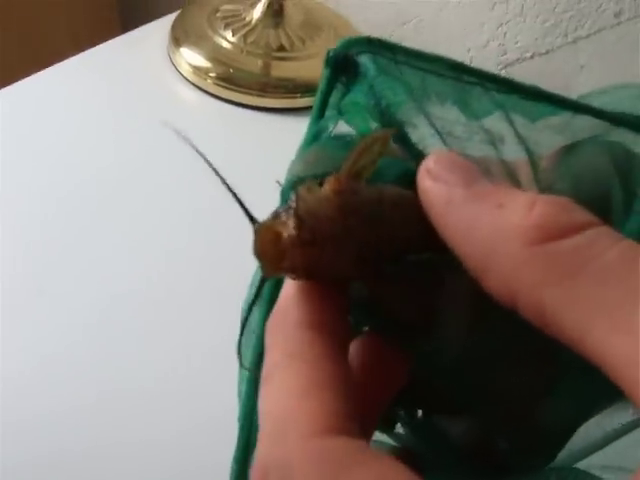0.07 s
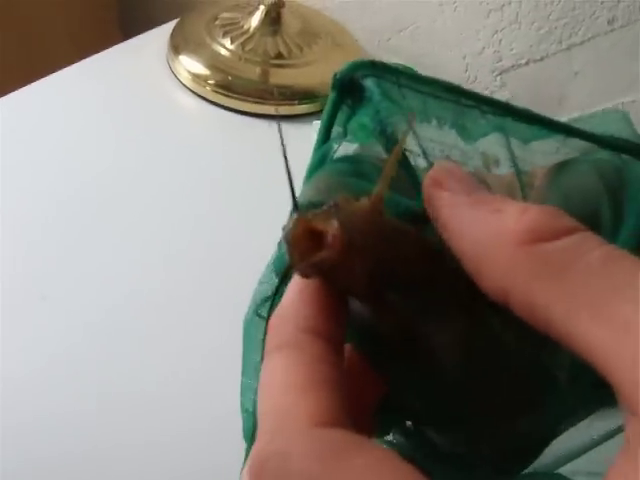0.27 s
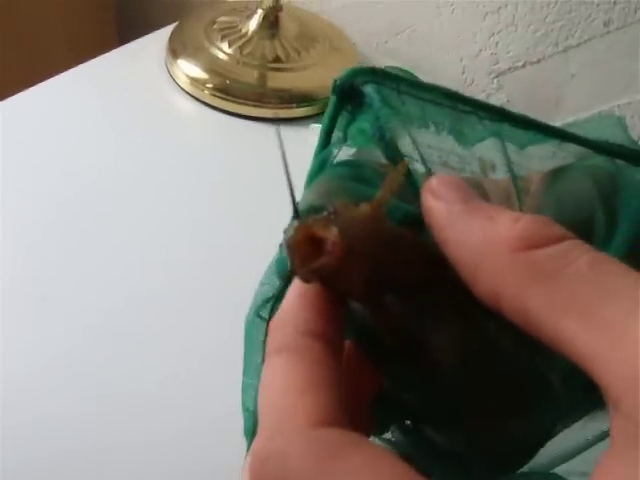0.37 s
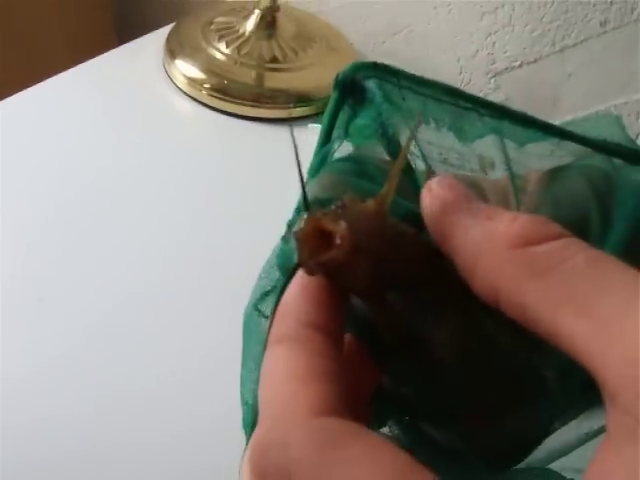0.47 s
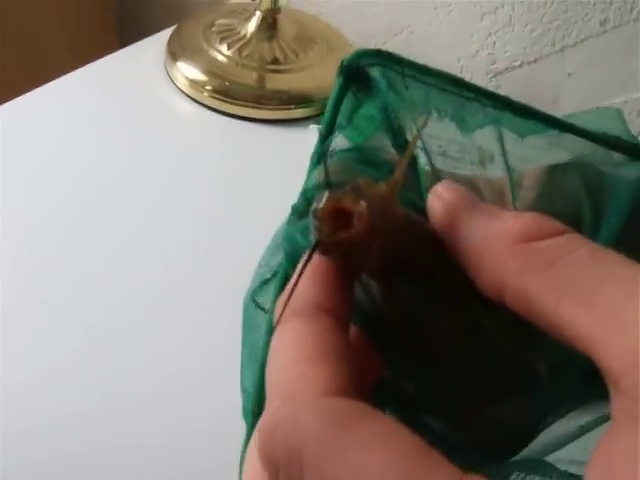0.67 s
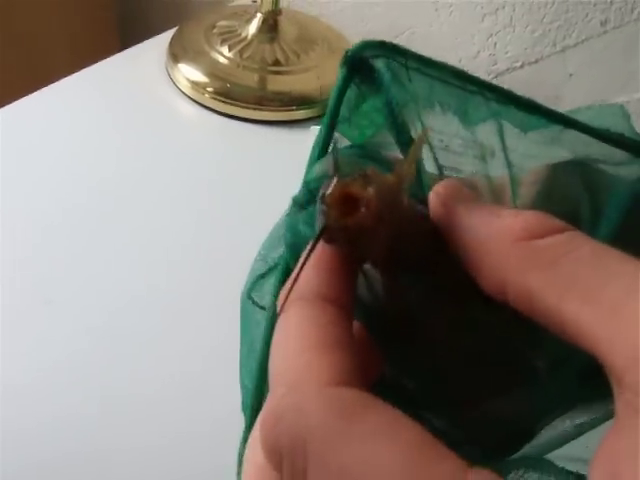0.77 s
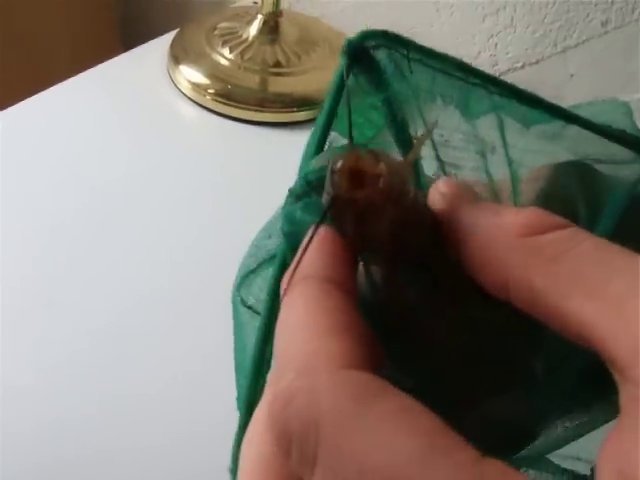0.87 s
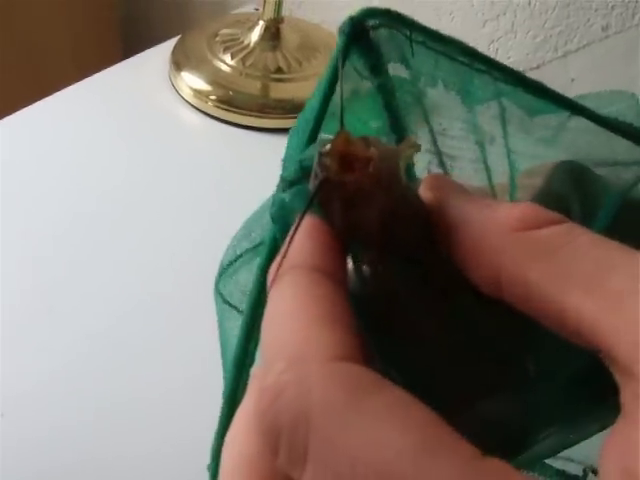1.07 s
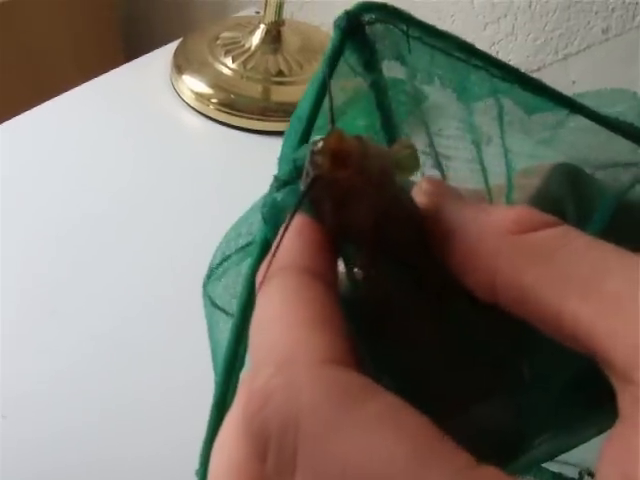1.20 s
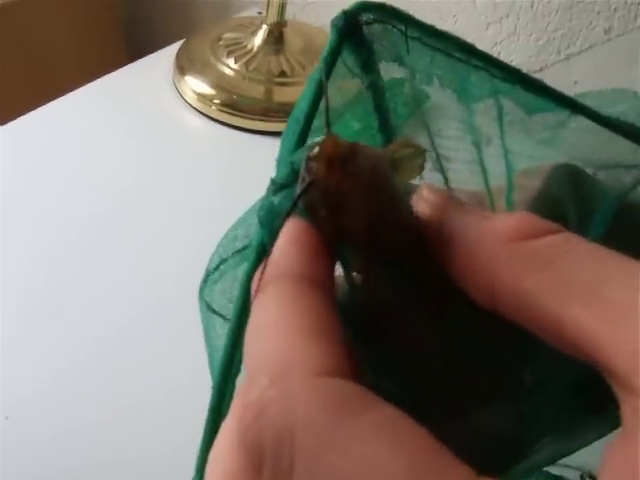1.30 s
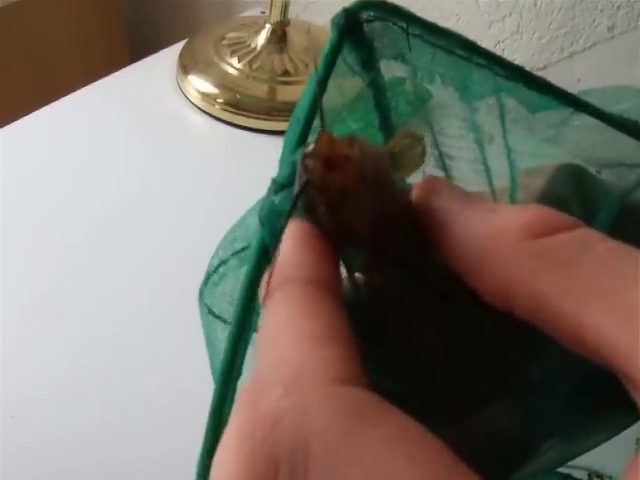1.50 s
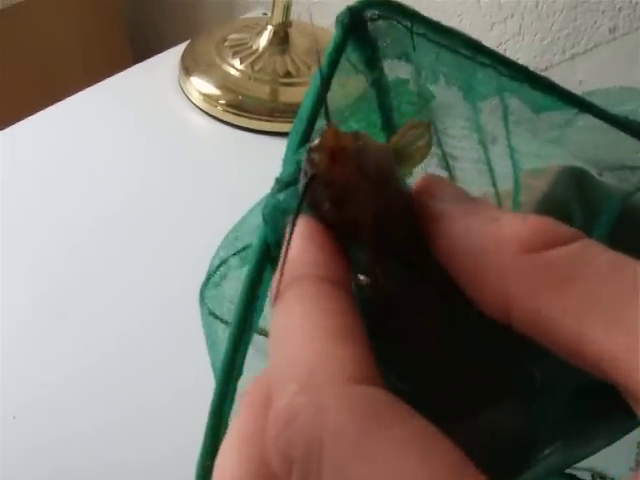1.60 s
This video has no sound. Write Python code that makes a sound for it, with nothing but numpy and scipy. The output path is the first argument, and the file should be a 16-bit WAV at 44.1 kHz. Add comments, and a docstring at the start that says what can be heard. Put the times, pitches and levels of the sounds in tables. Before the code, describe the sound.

A catfish held in a net croaks close to the microphone: eight short, raspy bursts of clicks in four quick pairs. It then stops, leaving faint hiss and a low hum in a small room.

```python
"""A small room, the microphone close to a catfish held in a net. The fish stridulates: four
out-and-back strokes of a fin spine. The spine's ridged base catches in its socket and slips, so each
stroke is a rasp of clicks that slow, swell and hurry off. Every click rings the bony girdle, then the
body and the spine's shaft. Table and walls echo it, over a few wet ticks, a low hum and hiss."""
import sys
import numpy as np
from scipy import signal
from scipy.fft import rfft, irfft
from scipy.io import wavfile
from scipy.ndimage import uniform_filter1d

SR = 44100
rng = np.random.default_rng(int(sys.argv[2]) if len(sys.argv) > 2 else 0)


def file_out(sig):
    """Save sig as 16-bit WAV at sys.argv[1]."""
    # one column per channel
    cols = np.atleast_2d(sig).T
    # limit, then scale
    lim = np.clip(cols, -1, 1)
    pcm = np.round(lim * 32767).astype(np.int16)
    wavfile.write(sys.argv[1], SR, pcm)


N = 72765

# Strokes close to the microphone, out and back in turn: (start [s], length [s], ridges [count],
# longest / shortest gap [ratio], slowest place [0-1], loudest place [0-1], rise to it [dB],
# girdle trim [dB], body trim [dB], shaft trim [dB], girdle pitch [ratio])
SPINE_STROKES = [ (.2229, .0939, 24, 2.78, .82, 0.86, 13, 0, 1.5, 5.5, 1.014),
                 (.3351, 0.06, 11, 3.3, 0.58, 0.83, 8.5, 0, -5, -16, 0.99),
                 (.4268, .0905, 19, 2.9, .74, 0.75, 6, -2.5, 1, -3.5, 1.032),
                 (.5405, .0690, 12, 2.8, 0.55, 0.68, 5, -1.5, -7, -9, 1.0),
                 (.6422, 0.091, 19, 3.18, 0.74, 0.71, 8, -3.5, 1, 0.5, 1.02),
                 (.7605, .0730, 14, 2.2, .64, 0.7, 8.5, -3.5, -8.5, -10.5, 1.007),
                 (.8705, 0.091, 20, 2.2, 0.65, 0.65, 7.5, -5, -1.5, 0.5, 1.064),
                 (.9886, 0.077, 13, 2.38, .62, 0.48, 11, -3.5, -7.5, -13, 1.017)]
def spine(click_samples=600):
    """Ridge after ridge slips: the harder the spine presses, the longer the gap and louder the click."""
    grip_db, grip_s = -5.5, 0.0036  # the ridges take a moment to bite
    body_lead = 0.14  # the body peaks this share of a stroke sooner
    rasp = np.zeros(N)
    for k, stroke in enumerate(SPINE_STROKES):
        start, length, ridges, slowing, slowest, peak, rise_db, *trims_db, pitch = stroke
        girdle_db, body_db, shaft_db = trims_db
        back = k % 2
        fall_db = 10 if back else 9
        chance = rng.standard_normal((ridges, 3))
        midpoints = (np.arange(ridges - 1) + .5) / (ridges - 1)
        gaps = slowing ** np.interp(midpoints, [0, slowest, 1], [0, 1, 0])
        gaps *= 1 + .015 * chance[1:, 0]
        places = np.r_[0, np.cumsum(gaps)] / gaps.sum()
        for place, (_, level_chance, rebound_chance) in zip(places, chance):
            at = start + length * place
            i = int(at * SR) - click_samples // 10
            t = (i + np.arange(click_samples)) / SR - at
            girdle_gain = undb(girdle_db - 18 + swell(place, peak, rise_db, fall_db))
            body_gain = undb(body_db - 28 + swell(place, peak - body_lead, rise_db, fall_db))
            click = girdle_gain * girdle(t, back, pitch, rebound_chance)
            click += body_gain * body(t, back)
            click += undb(shaft_db - 33) * shaft(t, back, place)
            bite_db = grip_db * np.exp(-length * place / grip_s)
            rasp[i:i + click_samples] += click * undb(bite_db + .7 * level_chance)
    # so small a body gives off no bass
    return signal.sosfilt(signal.butter(2, 650, "high", fs=SR, output="sos"), rasp)


# Modes of the bony girdle: (base pitch [Hz], t60 [s], out level [dB], back level [dB])
GIRDLE_MODES = [(4670, 0.0037, -13.5, -29), (5690, 0.0061, -14, -13), (6920, 0.0035, -1.5, -5),
                (7610, 0.0042, -8.5, -5)]
def girdle(t, back, pitch, rebound_chance):
    """The bone rings first and brightest; the spine knocks once more after each slip."""
    lead_s, attack_s = 0.000295, 0.00027
    rebound_s = 0.000536 * (1 + 0.16 * rebound_chance)
    slip = strike(t + lead_s, GIRDLE_MODES, back, pitch, attack_s)
    rebound = strike(t + lead_s - rebound_s, GIRDLE_MODES, back, pitch, attack_s)
    return slip + undb(-4) * rebound


# Modes of the body: (base pitch [Hz], t60 [s], out level [dB], back level [dB])
BODY_MODES = [(1270, 0.0037, -11, -7.5), (1654, 0.0099, -3, -4.5), (2160, 0.0059, -5, 1.5),
              (2626, 0.0048, -4.5, 3), (3610, 0.006, -2.5, -8)]
def body(t, back):
    """The body answers each slip with a lower, softer knock."""
    return strike(t, BODY_MODES, back, pitch=0.97)


# Modes of the spine's shaft: (base pitch [Hz], t60 [s], out level [dB], back level [dB])
SHAFT_MODES = [(978, 0.0077, -8, 5.5), (4800, .013, -4, -12)]
def shaft(t, back, place, peak=0.17):
    """The shaft rings loudest early in a stroke, and its modes climb from click to click."""
    modes = sum(strike(t, [mode], back, pitch=1 + climb * (place - peak))
                for mode, climb in zip(SHAFT_MODES, (.9, 0.15)))
    return modes * undb(swell(place, peak, rise_db=4, fall_db=21))


def strike(t, modes, back, pitch, attack_s=0.000715):
    """One click rings a part of the fish, a little differently each time."""
    sound = np.zeros(len(t))
    for hz, t60, out_db, back_db in modes:
        db = (back_db if back else out_db) + rng.normal(0, 1.2)
        sound += undb(db) * ring(t, hz * pitch * rng.normal(1, .025), t60, attack_s)
    return sound


def swell(place, peak, rise_db, fall_db):
    """Arch of loudness along a stroke, in dB."""
    before = rise_db * (1 - place / peak) ** 2
    after = fall_db * ((place - peak) / (1 - peak)) ** 2
    return -np.where(place < peak, before, after)


def ring(t, hz, t60, attack_s):
    """A damped mode that starts at t = 0 and builds up over the attack."""
    t = np.maximum(t, 0)
    rise = np.sin(np.pi / 2 * np.minimum(t / attack_s, 1)) ** 2
    return rise * undb(-60 * t / t60) * np.sin(2 * np.pi * hz * (t - attack_s))


# Wet ticks at the net: (time [s], pitch [Hz], t60 [s], level [dB])
WET_TICKS = [(.0620, 7820, 0.0055, -30), (1.3910, 3130, 0.0078, -32.5), (1.4324, 7700, .008, -38.5)]
def wet_ticks():
    """Tiny bubbles burst on the wet fish and net."""
    t = np.arange(N) / SR
    return sum(undb(db) * ring(t - at, hz, t60, attack_s=0.000718) for at, hz, t60, db in WET_TICKS)


# Echoes off the table and things on it: (delay [s], level [dB])
TABLE_ECHOES = [(.0017, -16), (.0029, -15)]
# Long, faint rings under the clicks: (pitch [Hz], relative level [dB])
FAINT_RINGS = [(1595, -2), (1678, -1), (2014, -2), (2430, -5), (2780, -3), (3535, -5), (5297, 4),
               (5690, -1), (6040, -5), (6770, 0), (7030, -3), (7610, -3)]
def room(sound, ring_t60=.065):
    """The direct sound reaches the microphone with close echoes, faint rings and a tail off the walls."""
    t = np.arange(SR // 2) / SR
    response = np.zeros(len(t))
    response[0] = 1
    for delay, db in TABLE_ECHOES:
        response += undb(db) * np.sinc((t - delay) * SR)
    for hz, db in FAINT_RINGS:
        response += undb(db - 50 - 60 * t / ring_t60) * np.cos(2 * np.pi * hz * t)
    onset = np.minimum(t / .001, 1) ** 2
    for db, t60 in ((-10, .045), (-12, 0.39)):  # quick scatter, then the walls
        tail = rng.standard_normal(len(t)) * undb(-60 * t / t60) * onset
        response += undb(db) * tail / np.linalg.norm(tail)
    return signal.fftconvolve(sound, response)[:N]


# Hum and thin whine behind the fish: (pitch [Hz], rms level [dB], flutter [dB])
HUM_TONES = [(160.9, -55.5, 1), (138.1, -64.5, 1.5), (209.3, -68, -1.5), (579.7, -69.5, 8.5),
             (8300, -70, 4.5), (7140, -76, -3)]
def hum():
    """Tones waver in phase and level, as of a small motor."""
    t = np.arange(N) / SR
    tones = np.zeros(N)
    for hz, db, flutter_db in HUM_TONES:
        tone = np.sin(2 * np.pi * hz * t + 1.2 * drift(5))
        tones += level(tone * undb(flutter_db * drift(11.38)), db)
    return tones


# Spectra of the room tone: (frequency [Hz], relative density [dB])
RUMBLE_SPECTRUM = [(20, 2.5), (65, 1.5), (100, -0.5), (170, 6), (240, 7), (330, -17), (600, -34)]
HISS_SPECTRUM = [(150, -42), (250, -9), (373, -5.5), (432, -7.5), (564, -4), (684, -6.5), (782, -7),
                 (1960, -13.5), (7530, -14), (8600, -21), (11200, -65), (18900, -120)]
def room_tone():
    """Low rumble and even hiss fill the room."""
    return level(noise(RUMBLE_SPECTRUM), -59.5) + level(top_cut(noise(HISS_SPECTRUM)), -53.5)


def noise(spectrum):
    """Noise shaped by (Hz, dB) points."""
    hz, db = np.array(spectrum).T
    f = np.maximum(np.fft.rfftfreq(N, 1 / SR), 1)
    gain = undb(np.interp(np.log(f), np.log(hz), db))
    return irfft(rfft(rng.standard_normal(N)) * gain, N)


def drift(rate_hz):
    """A slow random wander with an rms of 1."""
    hold = int(SR / rate_hz)
    steps = np.repeat(rng.standard_normal(N // hold + 1), hold)
    return level(uniform_filter1d(uniform_filter1d(steps, hold), hold)[:N], 0)


def top_cut(x, cutoff_hz=9050):
    """Steep low-pass at the top of the band."""
    return signal.fftconvolve(x, signal.firwin(301, cutoff_hz, window=("kaiser", 8), fs=SR), "same")


def undb(db):
    """Decibels to gain."""
    return 10 ** (db / 20)


def level(x, db):
    """Scale to an rms level."""
    return x * undb(db) / np.sqrt(np.mean(x ** 2))


def scene():
    """The fish close up, the room behind it, in mono."""
    return (room(spine() + wet_ticks()) + hum() + room_tone())[None]


def record(dry, rolloff_hz=8422):
    """The microphone's treble rolls off and is then cut."""
    f = np.fft.rfftfreq(N, 1 / SR)
    soft = irfft(rfft(dry[0]) / (1 + (f / rolloff_hz) ** 36), N)
    return top_cut(soft)[None]


dry = scene()
out = record(dry)
file_out(out)
```